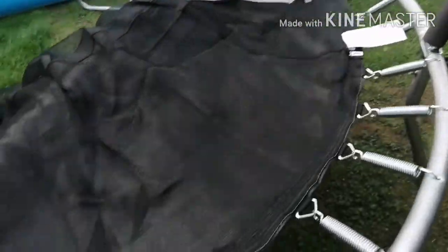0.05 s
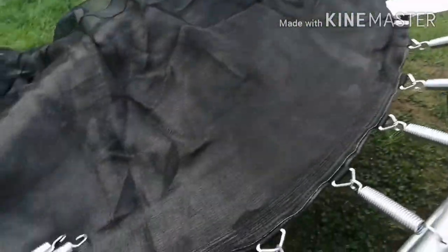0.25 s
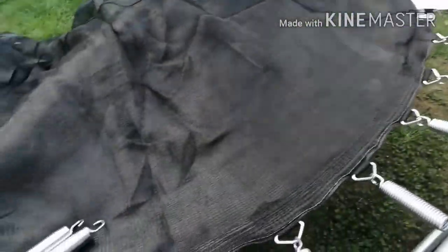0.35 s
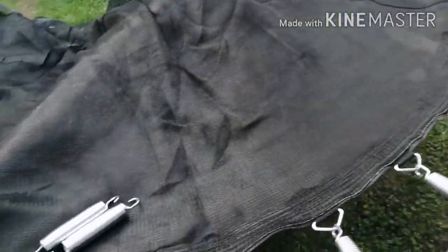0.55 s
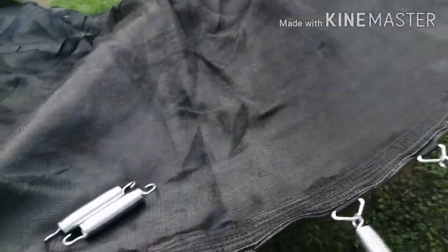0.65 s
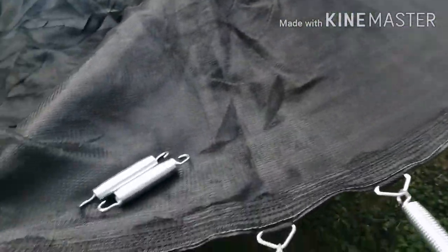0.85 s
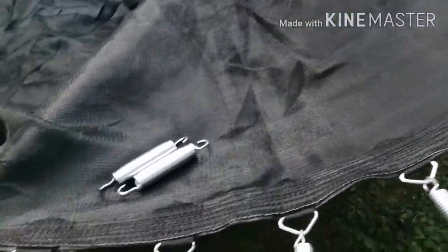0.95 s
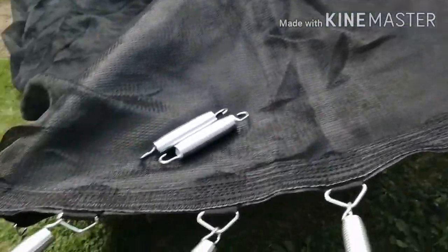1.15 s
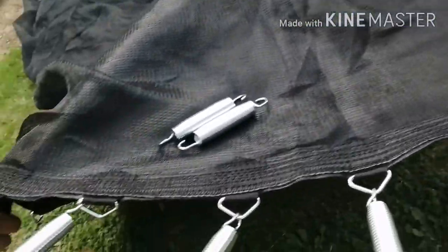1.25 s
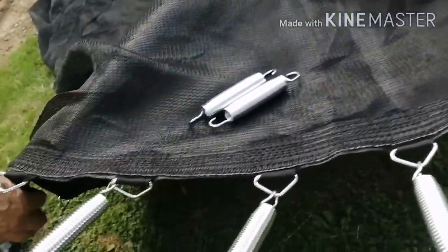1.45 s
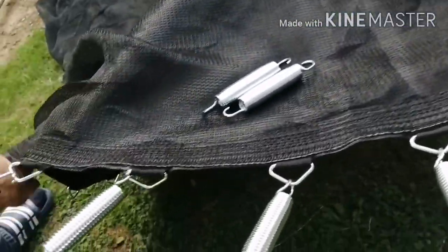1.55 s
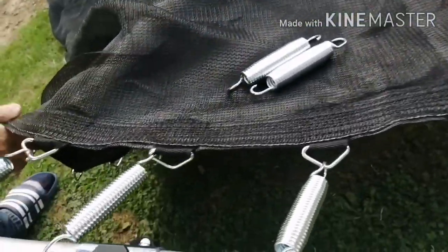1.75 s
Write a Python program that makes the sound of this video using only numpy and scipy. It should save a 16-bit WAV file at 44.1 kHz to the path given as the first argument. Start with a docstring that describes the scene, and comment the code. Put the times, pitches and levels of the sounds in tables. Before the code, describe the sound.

A sharp metallic click comes from a spring being hooked onto a trampoline, after the mat swishes, ticks and settles. The hook then scrapes faintly. Light gusts rumble on the right side of a handheld microphone outdoors.

```python
"""A woven trampoline mat slides and rustles, with a few small snaps, outdoors on a lawn.
Its threads catch and slip, and its creases let go. Then a steel spring clicks twice in quick
succession as it is hooked on: each blow excites its modes until contact damps them. The hook
scrapes briefly. Light wind buffets the right port of a handheld microphone over a quiet wash."""
import sys
import numpy as np
from scipy import signal
from scipy.fft import rfft, irfft
from scipy.io import wavfile
from scipy.ndimage import uniform_filter1d

SR = 44100
rng = np.random.default_rng(int(sys.argv[2]) if len(sys.argv) > 2 else 0)


def persist_wave(psi):
    """Save psi, clipped to +-1, as 16-bit WAV."""
    counts = np.round(np.clip(psi, -1, 1) * 32767).astype(np.int16)
    wavfile.write(sys.argv[1], SR, np.atleast_2d(counts).T)


N = 79380
TIME = np.arange(N) / SR
SIDE_LAG_S = 0.0003047  # sound from the side reaches the right port this much later

# Modes of the steel spring. Each row: frequency in Hz, level in dB when struck at the hook,
# level in dB when struck at the coil, T60 in seconds, left minus right level in dB.
SPRING_MODES = [(3230, -38, -41, 0.029, 2), (4780, -54, -52, 0.016, -1), (5270, -24.5, -28, 0.041, 6.5),
                (5395, -41, -35, 0.036, -3), (5825, -33.5, -37, 0.059, -1), (6050, -29, -43, 0.036, 6),
                (6300, -43, -32.5, 0.02, 6), (7834, -59, -26.5, 0.024, 5.5), (8090, -62, -25, 0.029, 7.5),
                (8780, -31, -32, 0.023, 2.5), (9700, -47, -41, 0.03, -5), (11610, -30, -40, 0.027, 19.5),
                (12250, -37.5, -46, 0.034, -15), (14850, -36, -33, 0.06, 3)]
LOWEST_MODE_HZ = SPRING_MODES[0][0]


def spring():
    """Modal vibration: blows ring the steel, contact damps it, and a faint shimmer stays in the coils."""
    # Two blows and a faint rebound. Each row: start in seconds, level in dB,
    # place from 0 (hook) to 1 (coil), seconds until contact damps the ring.
    strikes = [(1.5135, 2, 0.05, 0.0077), (1.5280, 3, 0.98, 0.0053), (1.554, -23, 0.46, 0.0054)]
    # Diffuse ring of the coils. Each row: frequency in Hz, spectral density in dB.
    coils = [(1500, -47.5), (2400, -23), (3150, 3), (3700, -55), (4200, -19), (4700, -2.5), (5300, 3),
             (5800, 6.5), (6400, -0.5), (7200, -8.5), (8000, 0), (9200, -9), (10700, -10), (11700, 2),
             (15500, -8)]
    # A notch near 4 kHz that softens the onset of the clicks. Each row: frequency in Hz, gain in dB.
    notch = [(3350, -1), (3950, -12), (4700, 0)]
    crack_db, shimmer_db, after_ring_db = -32, -42, -23
    out = np.zeros((2, N))
    for start, db, place, contact_s in strikes:
        free = 1 - rise(start + contact_s, length_s=0.0012)
        onset = rise(start, length_s=0.00027)
        for hz, hook_db, coil_db, t60, pan_db in SPRING_MODES:
            after_ring = amp(after_ring_db) * decay(start, t60=0.3 * LOWEST_MODE_HZ / hz)
            envelope = onset * (free * decay(start, t60) + after_ring)
            tone = np.sin(2 * np.pi * (hz * (TIME - [[0], [SIDE_LAG_S]]) + rng.random()))
            mode_db = db + hook_db + place * (coil_db - hook_db)
            pan = amp([[pan_db / 2], [-pan_db / 2]])
            out += amp(mode_db) * pan * envelope * tone
        out += amp(db + crack_db) * decay(start, t60=0.032) * noise_pair(coils)
        shimmer = rise(start, length_s=0.014) * decay(start, t60=0.19) * noise_pair(coils)
        out += amp(db + shimmer_db) * shimmer
    return np.array([colour(port, notch) for port in out])


def scrape():
    """Frictional excitation: the hook slips a little and the spring's lowest mode pings."""
    # Friction noise of the hook. Each row: frequency in Hz, spectral density in dB.
    friction = [(2400, -18), (3200, -4), (3900, -25), (4800, 1), (5700, -4), (9000, -1), (10500, -14),
                (15500, -24)]
    ping = amp(-0.5) * np.sin(2 * np.pi * LOWEST_MODE_HZ * TIME)
    return swell(centre_s=1.681, sigma_s=0.004, db=-54) * (noise_pair(friction) + ping)


def mat():
    """Sliding friction: the swish sinks in pitch as the weave slows; cloth rustles and a fold drags."""
    # Motion of the mat. Each row: time in seconds, level in dB, pitch of the passing threads in Hz.
    motion = [(0, -68, 6000), (.11, -66.5, 6223), (.17, -55, 6600), (.215, -48.5, 5940),
              (.265, -47.5, 6269), (.3, -46.5, 5989), (.34, -45.5, 5450), (.375, -49.5, 5630),
              (.45, -54, 5540), (.5, -58, 5600), (.54, -66.5, 5600), (.74, -67.5, 5240), (.9, -79, 5560),
              (1.1, -77, 5561), (1.8, -69.5, 5930)]
    # Hiss of the weave and rustle of slack cloth. Each row: frequency in Hz, spectral density in dB.
    weave = [(1000, -24.5), (1700, -2), (2400, -16), (3100, 3), (3800, -9), (5000, -2.5), (6200, 0),
             (7500, -2.5), (9000, -2.5), (11000, -8), (15300, -8), (16300, -27)]
    slack = [(300, -1.5), (900, -5), (1700, -1.5), (2600, 0.5), (3200, -4), (3900, -9.5), (6000, -16.5),
             (9000, -14), (15300, -17.5), (16000, -44)]
    # Course of the rustle. Each row: time in seconds, level in dB.
    crumple = [(0, -56), (.25, -57), (.45, -60.5), (.6, -58), (.75, -56), (.95, -61.5), (1.1, -69.5),
               (1.55, -64.5), (1.8, -68)]
    # Resonances of the dragging fold. Each row: frequency in Hz, bandwidth in Hz, relative level in dB.
    fold_modes = [(1720, 410, 3.5), (3130, 530, 5)]
    times, slide_db, pitch_hz = np.transpose(motion)
    hiss = np.array([unit(colour(grains(), weave)) for port in range(2)])
    swish = amp(-6) * grain_band(np.interp(TIME, times, pitch_hz), width_hz=790)
    slide = amp(np.interp(TIME, times, slide_db)) * (hiss + both_ports(swish, SIDE_LAG_S))
    rustle = level(crumple) * np.array([unit(colour(grains(), slack)) for port in range(2)])
    fold = sum(amp(db) * grain_band(hz, width_hz) for hz, width_hz, db in fold_modes)
    drag = swell(centre_s=0.2315, sigma_s=0.014, db=-47.5) * unit(fold)
    rub = swell(centre_s=0.82, sigma_s=0.11, db=-66.5) * grain_band(hz=5550, width_hz=550)
    return slide + rustle + drag + both_ports(rub, SIDE_LAG_S)


def grains(per_second=6000, spread_db=7, smooth_share=0.52):
    """Stick-slip friction: threads catch and let go in thousands of tiny clicks over a smooth hiss."""
    sizes = amp(spread_db * np.minimum(rng.exponential(1, N), 5)) * rng.choice([-1, 1], N)
    clicks = unit(sizes * (rng.random(N) < per_second / SR))
    return np.sqrt(1 - smooth_share) * clicks + np.sqrt(smooth_share) * rng.standard_normal(N)


def grain_band(hz, width_hz):
    """Resonance: friction grains drive a narrow band around a steady or gliding frequency."""
    carrier = np.exp(2j * np.pi * np.cumsum(np.full(N, hz)) / SR)
    pole = np.exp(-np.pi * width_hz / SR)
    baseband = signal.lfilter([(1 - pole) ** 2], [1, -2 * pole, pole ** 2], grains() / carrier)
    return unit((carrier * baseband).real)


def snaps():
    """Sudden release of strain: creases let go in bright ticks, duller when a whole fold moves."""
    # Snaps of the mat. Each row: start in seconds, level in dB, T60 in seconds, dull share from 0 to 1.
    releases = [(.3477, -14, 0.0033, 0), (0.3638, -31.5, 0.013, 0.38), (.5185, -43.5, 0.017, 1)]
    # A bright tick and the body of a fold. Each row: frequency in Hz, spectral density in dB.
    tick = [(300, -25), (2000, -18), (3900, -18), (5200, -8), (6100, 0), (7500, -4), (9500, -5),
            (15500, -5)]
    fold = [(400, -20), (1200, -11), (1900, 0), (2200, -1), (2600, -12), (3200, -7), (3900, -22),
            (5000, -7), (12000, -21)]
    out = np.zeros(N)
    for start, db, t60, dull_share in releases:
        envelope = decay(start, t60)
        slip = envelope * rng.standard_normal(N)
        bright = np.sqrt(1 - dull_share) * unit(colour(slip, tick))
        dull = np.sqrt(dull_share) * unit(colour(slip, fold))
        out += amp(db) * (bright + dull) * np.sqrt(np.mean(envelope ** 2))
    return both_ports(out, lag_s=0.00005)  # almost straight ahead


def wind():
    """Turbulent pressure: eddies and puffs push on the right port; the left one is sheltered."""
    # Pressure of the eddies. Each row: frequency in Hz, spectral density in dB.
    buffet = [(10, -16), (28, -7), (45, -1.5), (72, 0), (110, -4), (160, -12), (240, -23), (400, -43),
              (1000, -70)]
    # Course of the gusts. Each row: time in seconds, level in dB.
    gusts = [(0, -60.5), (.48, -52), (.56, -35), (.67, -46.5), (.78, -42), (.82, -52), (.9, -44),
             (.99, -47), (1.015, -32), (1.06, -35), (1.15, -43.5), (1.265, -46.5), (1.285, -35.5),
             (1.33, -31), (1.375, -53), (1.46, -33.5), (1.51, -34), (1.54, -61), (1.8, -44.5)]
    # Thumping puffs. Each row: centre in seconds, Gaussian sigma in seconds, level in dB, pitch in Hz.
    puffs = [(1.057, 0.0025, -17, 113), (1.097, 0.0047, -20.5, 68), (1.126, .005, -25.5, 88),
             (1.349, 0.0073, -24.5, 52), (1.476, 0.0083, -19, 54)]
    eddies = noise(buffet)
    strength = uniform_filter1d(abs(signal.hilbert(eddies)), size=900)
    pressure = unit(eddies / strength ** 0.14) * level(gusts)  # the division partly fills the lulls
    for centre_s, sigma_s, db, hz in puffs:
        pressure += swell(centre_s, sigma_s, db) * np.sin(2 * np.pi * (hz * TIME + rng.random()))
    return np.array([np.zeros(N), pressure])


def wash():
    """Partial coherence: distant, gently wavering noise is alike at both ports only in the bass."""
    # Outdoor background. Each row: frequency in Hz, spectral density in dB.
    spectrum = [(15, -3), (60, 9.5), (130, 0.5), (220, -2.5), (350, -5.5), (530, -1), (750, -2.5),
                (1000, -1), (1350, -11.5), (1900, -16.5), (3200, -16), (3900, -24.5), (5500, -25),
                (9000, -27), (15300, -29.5), (16200, -65)]
    # Likeness of the two ports. Each row: frequency in Hz, correlation from 0 to 1.
    likeness = [(40, 1), (250, 0.99), (700, 0.17), (1500, 0.011), (3000, 0.16), (8000, 0.041)]
    left, unrelated = noise_pair(spectrum)
    correlation = at_hz(likeness, np.fft.rfftfreq(N, 1 / SR))
    right = irfft(correlation * rfft(left) + np.sqrt(1 - correlation ** 2) * rfft(unrelated), N)
    flutter_db = noise([(1, 1.0), (10, 3), (40, -28), (200, -100)])
    return amp(-50.5 + flutter_db) * np.array([left, right])


def amp(db):
    """Amplitude ratio for a level in decibels."""
    return 10 ** (np.asarray(db) / 20)


def unit(x):
    """Normalisation to an rms of 1."""
    return x / np.sqrt(np.mean(x ** 2) + 1e-20)


def at_hz(points, hz):
    """Interpolation of a spectrum on a log-frequency axis."""
    frequencies, values = np.transpose(points)
    return np.interp(np.log(hz + 1), np.log(frequencies + 1), values)


def level(points):
    """Amplitude envelope from a curve in decibels."""
    return amp(np.interp(TIME, *np.transpose(points)))


def colour(x, points, size=4096):
    """Minimum-phase filtering with the given spectrum."""
    log_gain = np.log(amp(at_hz(points, abs(np.fft.fftfreq(size, 1 / SR)))))
    taps = np.fft.ifft(np.exp(np.conj(signal.hilbert(log_gain)))).real
    return signal.fftconvolve(x, taps[:size // 2])[:len(x)]


def noise(points):
    """Stationary noise of rms 1 with the given spectrum."""
    gain = amp(at_hz(points, np.fft.rfftfreq(N, 1 / SR)))
    return unit(irfft(rfft(rng.standard_normal(N)) * gain, N))


def noise_pair(points):
    """Uncorrelated noise for the two ports."""
    return np.array([noise(points), noise(points)])


def decay(start, t60):
    """Exponential damping: from the start, a fall of 60 dB every t60 seconds."""
    return (TIME >= start) * np.exp(-np.log(1000) * np.maximum(TIME - start, 0) / t60)


def rise(start, length_s):
    """Smooth onset from 0 to 1."""
    return 1 - np.exp(-(np.maximum(TIME - start, 0) / length_s) ** 2)


def swell(centre_s, sigma_s, db):
    """Gaussian envelope peaking at the given level."""
    return amp(db) * np.exp(-0.5 * ((TIME - centre_s) / sigma_s) ** 2)


def both_ports(x, lag_s):
    """Path difference: the sound reaches the right port a little later."""
    return np.array([x, np.interp(TIME - lag_s, TIME, x)])


def scene():
    """Superposition of all sources at the microphone."""
    return spring() + scrape() + mat() + snaps() + wind() + wash()


def record(dry):
    """Port resonance colours each side; gain control ducks after loud peaks; a low-pass limits the band."""
    # Response of each microphone port. Each row: frequency in Hz, gain in dB.
    left_port = [(2500, -1), (3200, -2.5), (4200, 1.5), (5400, -0.5), (6400, -2.5), (7700, 1.5), (8800, 8),
                 (9700, 5.5), (10700, -0.5), (15000, -5.5)]
    right_port = [(2500, 0), (4200, 1.5), (5200, 12), (5850, 10.5), (6550, 10.5), (7500, 2.5), (9000, -5.5),
                  (11000, -3), (13700, -1), (14800, 1.5)]
    threshold_db, duck_slope, release_db_per_s = -23.5, 0.63, 45
    ports = np.array([colour(dry[0], left_port), colour(dry[1], right_port)])
    power = abs(uniform_filter1d((ports ** 2).mean(0), size=64))
    power_db = 10 * np.log10(power + 1e-12)
    release_db = release_db_per_s * TIME
    held_db = np.maximum.accumulate(power_db + release_db) - release_db  # jumps to a peak, then sinks
    ducked = ports / amp(duck_slope * np.maximum(held_db - threshold_db, 0))
    low_pass = signal.firwin(255, cutoff=16400, window=("kaiser", 9), fs=SR)
    return signal.oaconvolve(ducked, low_pass[None], "same")


dry = scene()
out = record(dry)
persist_wave(out)
```